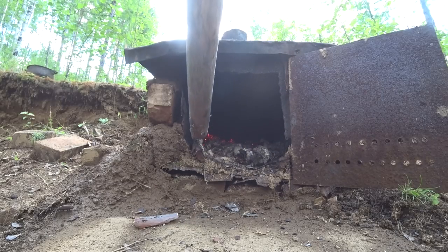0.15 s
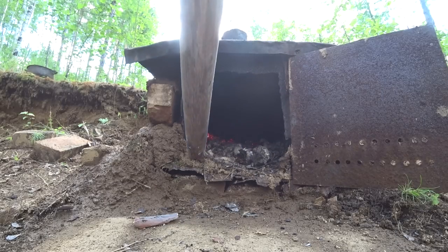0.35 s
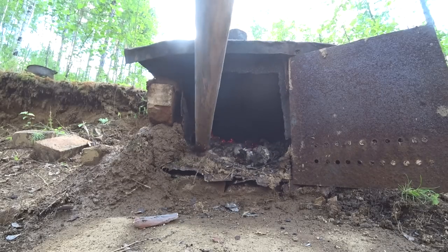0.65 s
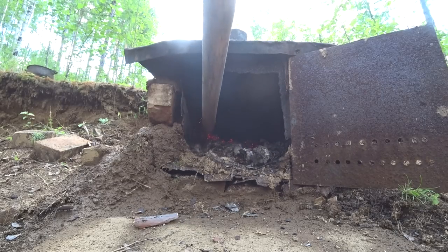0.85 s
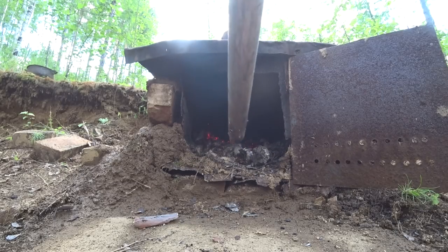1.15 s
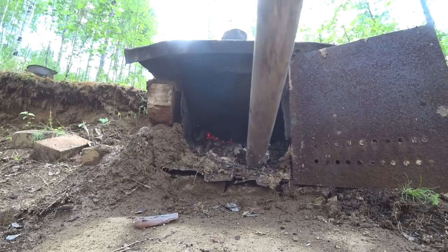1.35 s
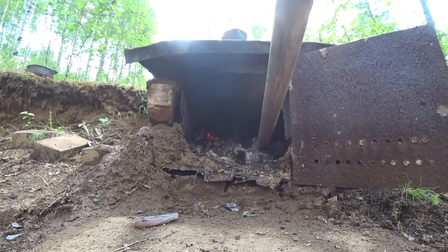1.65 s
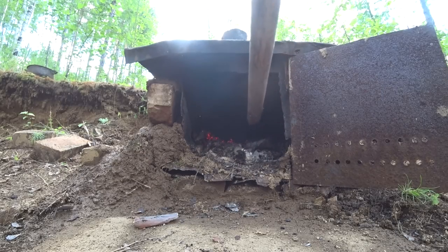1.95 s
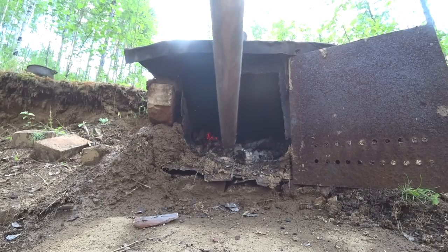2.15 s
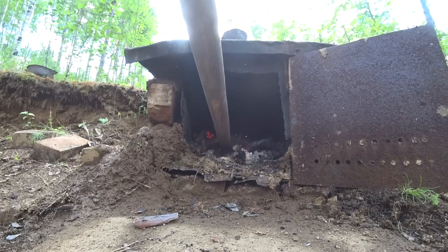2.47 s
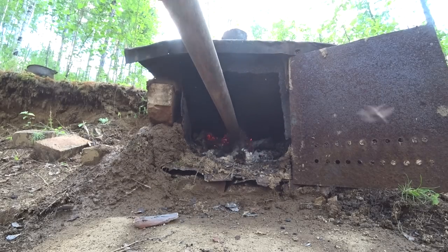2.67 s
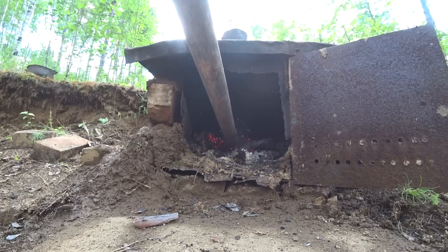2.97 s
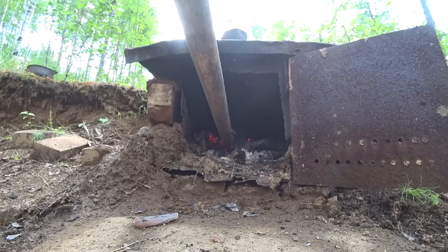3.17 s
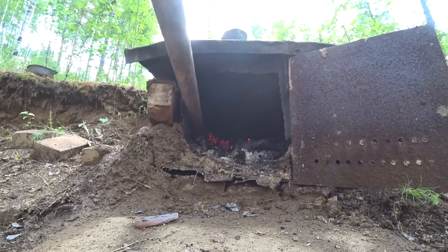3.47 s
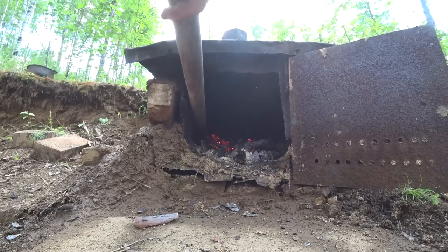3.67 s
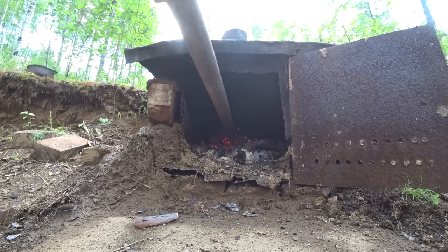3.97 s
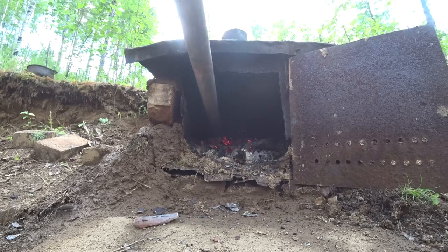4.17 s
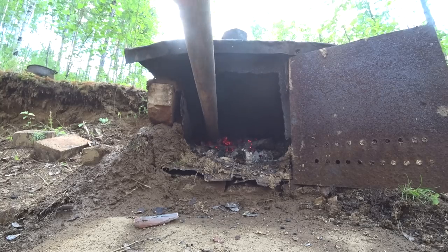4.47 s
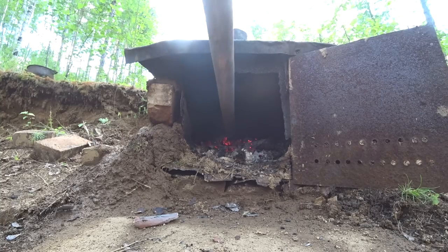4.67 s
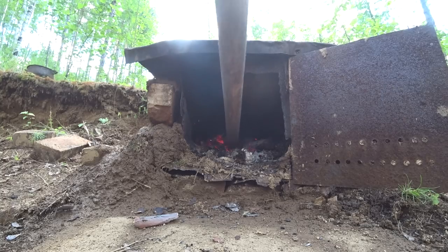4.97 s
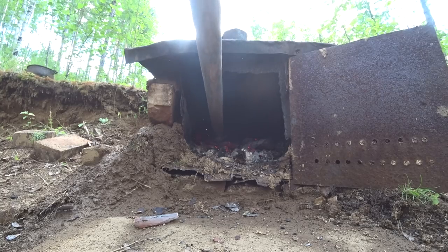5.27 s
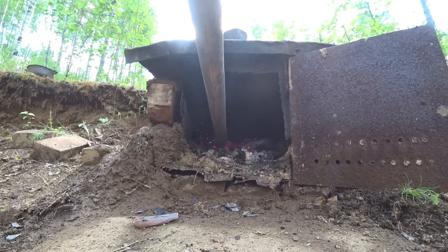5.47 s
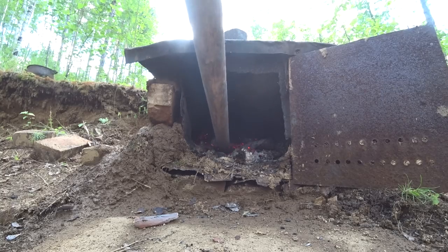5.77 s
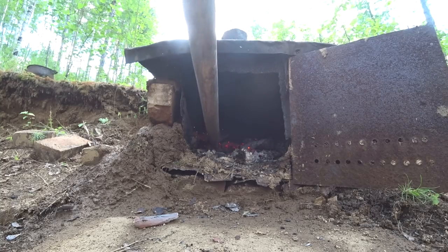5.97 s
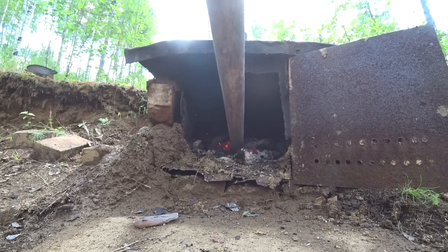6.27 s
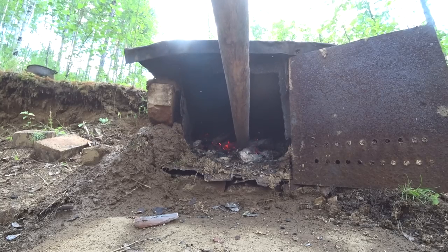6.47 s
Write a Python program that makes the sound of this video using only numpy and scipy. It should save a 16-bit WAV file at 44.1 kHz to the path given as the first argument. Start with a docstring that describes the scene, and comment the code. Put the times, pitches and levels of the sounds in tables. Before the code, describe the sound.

A long-handled rake scrapes and clanks through crunching charcoal in a small sheet-iron firebox, embers snapping sharply, a fly briefly buzzing past.

```python
"""Faint forest hiss and lone ember snaps, then a long-handled rake drags through a low sheet-iron firebox.
Leaves, wind and fire are random spectra; crunching charcoal and snaps are shaped noise bursts.
The iron box rings and the bed of embers thuds as sums of dying sines, struck by blows or shaken by grit.
Twice a fly buzzes past as a trembling harmonic stack; short echoes spread the near sounds in stereo."""
import sys
import numpy as np
from scipy import signal
from scipy.io import wavfile
from scipy.ndimage import uniform_filter1d

SR = 44100
rng = np.random.default_rng(int(sys.argv[2]) if len(sys.argv) > 2 else 0)


def master(y):
    """Save y as 16-bit WAV."""
    cut = np.clip(np.atleast_2d(y).T, -1, 1)
    pcm = np.round(cut * 32767)  # scale
    wavfile.write(sys.argv[1], SR, pcm.astype(np.int16))


def magnitude_from_level(level_db):
    """Linear magnitude for a level in decibels (20 dB per decade)."""
    exponent = np.asarray(level_db, float) / 20
    return 10 ** exponent


N = 291942  # length in samples


def evened(x):
    """Scales to rms 1."""
    return x / np.sqrt(np.mean(x ** 2) + 1e-20)


def read(points, hz):
    """Reads a spectrum in dB, interpolating along log frequency."""
    f, value = np.transpose(points)
    return np.interp(np.log(hz + 1), np.log(f + 1), value)


def add(mix, start_s, sound):
    """Mixes a sound in at start_s, cutting what runs past the end."""
    part = mix[..., round(start_s * SR):][..., :sound.shape[-1]]
    part += sound[..., :part.shape[-1]]


def colour(x, points):
    """Filters by a spectrum with causal (minimum) phase, so that clicks stay sharp."""
    hz = abs(np.fft.fftfreq(2048, 1 / SR))
    log_gain = np.log(magnitude_from_level(read(points, hz)))
    response = np.exp(np.conj(signal.hilbert(log_gain)))
    taps = np.fft.ifft(response).real[:1024]
    return signal.oaconvolve(x, taps)[:len(x)]


def ringing(modes, detune, damping=1, soft_s=.001):
    """A struck body: dying sines with a soft start; damping multiplies every t60."""
    t = np.arange(8000) / SR
    rings = 0
    for (hz, db, t60), off in zip(modes, detune):
        decay = magnitude_from_level(db - 60 * t / (t60 * damping))
        rings = rings + decay * np.sin(2 * np.pi * hz * (1 + off) * t)
    return rings * (1 - np.exp(-t / soft_s))


def grit(per_s, spread_db, clump_db, clump_s):
    """Random clicks of uneven size that come in clumps, as lumps break one after another."""
    spread = magnitude_from_level(spread_db * np.minimum(rng.exponential(1, N), 4))
    size = spread * rng.standard_normal(N)
    clumps = evened(uniform_filter1d(rng.standard_normal(N), max(int(clump_s * SR), 1)))
    clicks = rng.random(N) < per_s / SR
    return evened(size * clicks * magnitude_from_level(clump_db * clumps))


# Tone of leaves, wind and fire: pitch_hz, level_db (relative, per Hz)
FOREST_TONE = [(12, -20), (20, 3.5), (60, -13), (118, -14), (170, -16), (280, -18.5), (460, -20.5),
               (740, -25), (1400, -24), (2100, -31), (4000, -34), (6700, -36.5), (7650, -26.5), (8500, -39),
               (11400, -38), (14800, -85)]
# Stereo width of far sounds: pitch_hz, side_db (against mid)
FOREST_WIDTH = [(60, -14), (140, -1), (350, 5), (840, 8.5), (2020, 6.5), (4880, 2.5), (11800, -4)]


def forest():
    """Faint leaves, wind and fire hiss: random short-time spectra with drifting patches."""
    frames, hz = N // 256 + 5, np.fft.rfftfreq(1024, 1 / SR)
    a, b, c, d, patches = rng.standard_normal((frames, 513, 5)).T
    patches = uniform_filter1d(patches, size=12, axis=0)  # along frequency
    patches = evened(uniform_filter1d(patches, size=14, axis=1))  # along time
    width = magnitude_from_level(read(FOREST_WIDTH, hz))[:, None]
    spectra = np.array([a + 1j * b, (c + 1j * d) * width])
    spectra *= magnitude_from_level(read(FOREST_TONE, hz)[:, None] + 2.0 * patches)
    mid, side = signal.istft(spectra, nperseg=1024, noverlap=768)[1][:, :N]
    mid_rms_db = -59.5
    return magnitude_from_level(mid_rms_db) * np.array([mid + side, mid - side]) / mid.std()


# Tone of breaking charcoal, for snaps and crunching: pitch_hz, level_db (relative, per Hz)
CHARCOAL_TONE = [(880, -5.5), (1500, -12), (2940, -8), (4280, -1.5), (5160, -2.5), (6070, 0), (7640, 1),
                 (10800, -4.5), (11200, -8), (11500, -32), (15000, -19), (22000, -120)]
# Single embers snapping: start_s, level_db (of the burst), body (0 thin tick to 1 full crack)
EMBER_SNAPS = [(0.0448, -42.5, 1), (0.272, -45.5, 0.7), (0.4904, -41, 0.6), (0.5816, -27, 0.8),
               (0.6545, -25, 1), (0.6878, -21.5, 0.7), (0.7035, -17, 0.1), (0.7724, -28, 0.2),
               (0.786, -22.5, 0.25), (0.921, -39.5, 0.5), (1.1178, -48, 0.6), (1.255, -39.5, 0.7),
               (1.423, -45.5, 0.2), (1.5178, -26.5, 0.8), (1.545, -33, 0.9), (1.6248, -40, 0.8),
               (1.6602, -42.5, 0.5), (1.717, -36.5, 0.7), (1.7591, -27.5, 1), (1.941, -39, 0.5),
               (1.9759, -39.5, 1), (2.001, -44.5, 0.5), (2.045, -37.5, 0.2), (2.0592, -41, 0.4),
               (2.0936, -46, 0.6), (2.2453, -38, 0.6), (2.2723, -22.5, 0.4), (2.2824, -31, 0.3),
               (2.5925, -24, 0.3), (2.6447, -26, 0.3), (2.7468, -27.5, 0.4), (2.9095, -32, 0.5),
               (2.9274, -21, 0.04), (2.9568, -25, 0.05), (3.001, -38.5, 0.94), (3.025, -26, 0.67),
               (3.0678, -31, 0.3), (3.114, -35, 0.9), (3.1752, -38, 0.8), (3.1968, -27.5, 0.34),
               (3.237, -33, 0.4), (3.2575, -30, 0.5), (3.277, -27.5, 0.57), (3.3458, -41.5, 0.3),
               (3.402, -41.5, 0.8), (3.4241, -33.5, 0.7), (3.456, -38, 1), (3.482, -28.5, 0.73),
               (3.5094, -29, 0.4), (3.5757, -25, 0.4), (3.6065, -16.5, 0.34), (3.7454, -33, 0.6),
               (3.8174, -33, 0.6), (3.905, -24.5, 1), (3.9623, -28, 0.1), (4.0472, -27.5, 0.36),
               (4.0757, -29, 1), (4.134, -22, 0.5), (4.1883, -38, 0.5), (4.2462, -30.5, 0.7),
               (4.2662, -25, 0.3), (4.317, -25.5, 0), (4.3612, -18, 0), (4.4387, -27.5, 0.3),
               (4.497, -25, 0), (4.5936, -20.5, 0), (4.6084, -28.5, 0.1), (4.6399, -46, 0.4),
               (4.6743, -35, 0.3), (4.691, -30.5, 0.4), (4.803, -35.5, 0.3), (4.83, -34.5, 0.6),
               (4.9075, -40, 0.5), (4.9238, -23.5, 1), (5.015, -25, 0.3), (5.09, -32, 0.2),
               (5.1792, -35, 0.6), (5.2025, -34, 0.5), (5.228, -36, 0.2), (5.2498, -27, 0),
               (5.3146, -17.5, 0.5), (5.3597, -35, 0.3), (5.3996, -33, 0.2), (5.5834, -39, 0.5),
               (5.622, -44, 0.5), (5.6456, -41, 0.8), (5.6924, -35, 0.3), (5.702, -26, 0.4),
               (5.8527, -24, 0.2), (5.995, -11.5, 0.08), (6.0798, -40.5, 0.1), (6.3757, -37, 0.19),
               (6.4253, -30.5, 0.4), (6.5021, -18.5, 0.83), (6.551, -32, 0.5), (6.5943, -35.5, 0.9)]


def snaps():
    """Each snap is a burst of splinters that swells briefly and dies; fuller ones reach lower and ring longer."""
    rise_s, tick_t60_s, crack_t60_s = .0009, 0.0093, 0.015
    out, t = np.zeros(N), np.arange(2600) / SR
    for start_s, level_db, body in EMBER_SNAPS:
        splinters = rng.standard_normal(len(t)) * magnitude_from_level(5.8 * rng.standard_normal(len(t)))
        t60 = tick_t60_s + (crack_t60_s - tick_t60_s) * np.clip(body, 0, 1)
        shape = (1 - np.exp(-(t / rise_s) ** 2)) * magnitude_from_level(-60 * t / t60)
        # thin snaps tilt towards the treble around 8 kHz
        tone = [(hz, db - 5.8 * (1 - body) * np.log2(8000 / hz)) for hz, db in CHARCOAL_TONE]
        burst = colour(splinters * shape, tone)
        # the energy is set from the envelope, so short and long bursts match in strength
        strength = np.linalg.norm(shape / shape.max()) / np.linalg.norm(burst) / 2
        add(out, start_s, magnitude_from_level(level_db) * burst * strength)
    return out


def crunching():
    """Charcoal breaks in puffs of noise; big, middling and fine crumbs fill their own bands, partly in step."""
    puff = np.exp(-np.arange(600) / 60.)  # each break lasts a millisecond or two
    shared, out = grit(2300.0, 1.05, 1.8, .02) ** 2, np.zeros(N)
    for band_hz in [(300, 4500), (4500, 7500), (7500, 12000)]:
        breaks = shared + 0.73 * grit(1500., 2.1, 4.9, 0.012) ** 2
        power = signal.oaconvolve(breaks, puff ** 2)[:N]
        band = signal.butter(2, band_hz, "band", fs=SR, output="sos")
        out += signal.sosfilt(band, np.sqrt(abs(power)) * rng.standard_normal(N))
    return colour(out, CHARCOAL_TONE)


# Modes of the firebox, for scrapes and clanks: pitch_hz, level_db (relative), t60_s (before damping)
BOX_MODES = [(450, 1, 0.019), (560, 12.5, 0.013), (1070, 4, 0.028), (1473, -1, 0.033), (1655, 6, 0.021),
             (2246, 6.5, 0.022), (2790, 1.5, 0.031), (3567, 9, 0.015)]


def scraped_box():
    """Dense grit on the iron floor keeps the heavily damped box modes ringing."""
    ring = ringing(BOX_MODES, np.zeros(len(BOX_MODES)), damping=0.22, soft_s=0.0033)
    return signal.oaconvolve(grit(2500., 1.5, 3.8, 0.0056), ring)[:N]


# Modes of ground and ember bed, for rumble and thuds: pitch_hz, level_db (relative), t60_s (before damping)
BED_MODES = [(57.6, 6, 0.055), (86, -27, 0.017), (121, -4.5, 0.072), (171, 2.5, 0.031),
             (217.6, -4.5, 0.049), (280, -11.5, 0.067), (381, -12.5, 0.047)]


def shaken_ground():
    """Sparser grit shakes the low modes of the ground and bed."""
    ring = ringing(BED_MODES, np.zeros(len(BED_MODES)), damping=.65, soft_s=.003)
    return signal.oaconvolve(grit(600., 3., 2., .015), ring)[:N]


# Rake strokes, one list each: start_s (of each point), crunch_db (charcoal), scrape_db (iron floor)
RAKE_STROKES = [
    [(.487, -51, -53), (.573, -45.5, -52), (.679, -46, -46.5), (.707, -26, -61), (.735, -44.5, -81),
     (.8, -41.5, -61), (.88, -54.5, -65), (.95, -53, -71)],
    [(1.45, -51.5, -51), (1.514, -50, -48), (1.545, -54, -46), (1.6, -58, -77)],
    [(1.648, -55, -54), (1.673, -38, -51), (1.703, -70, -57.5), (1.76, -45.5, -55), (1.79, -52.5, -58),
     (1.9, -73, -78)],
    [(2.23, -42, -41.5), (2.287, -43, -49), (2.435, -44.5, -49.5), (2.569, -42.5, -48), (2.61, -50, -54),
     (2.681, -49.5, -63.5), (2.889, -53.5, -72), (2.91, -51, -63), (2.985, -52.5, -68)],
    [(3.026, -44, -56), (3.106, -61, -63.5), (3.19, -57.5, -77), (3.282, -57, -58.5), (3.36, -66, -72)],
    [(3.505, -24, -28.5), (3.547, -39, -46), (3.615, -33.5, -59), (3.667, -42, -54), (3.855, -30.5, -44.5),
     (3.93, -46, -51.5), (4.021, -55, -92), (4.081, -59, -58), (4.125, -65, -74)],
    [(4.248, -50, -56), (4.267, -28.5, -45), (4.297, -43.5, -57.5), (4.435, -47, -54), (4.475, -41, -49),
     (4.555, -51.5, -86), (4.6, -55.5, -65), (4.66, -60, -74)],
    [(4.897, -40, -47), (4.913, -39.5, -39), (5.131, -49.5, -64.5), (5.175, -63, -84), (5.209, -55.5, -64),
     (5.249, -50.5, -60), (5.29, -71, -69)],
    [(5.347, -40, -28), (5.361, -29.5, -30), (5.397, -52, -52.5), (5.415, -41, -69), (5.5, -85, -93)],
    [(5.684, -62, -57), (5.702, -35.5, -44), (5.748, -57, -58.5), (5.782, -49, -48), (5.874, -38.5, -53),
     (5.97, -53.5, -52), (6.011, -53.5, -63), (6.147, -60.5, -62)],
    [(6.175, -42, -37), (6.209, -62, -58), (6.265, -45, -51), (6.383, -51.5, -59), (6.473, -53, -64),
     (6.56, -58, -61.5), (6.62, -41.5, -45)],
]


def stroke_levels():
    """Joins the strokes into three gain curves; each starts at once, and loosened ash trickles on after it."""
    levels = np.zeros((3, N))
    for rows in RAKE_STROKES:
        s, crunch_db, scrape_db = np.transpose(rows)
        # the ground shakes with a blend of crunch and scrape
        rumble_db = -3.5 + scrape_db + 0.89 * (crunch_db - scrape_db)
        t = np.arange(s[0], s[-1], 1 / SR)
        fade_in, fade_out = (t - s[0]) / 0.0064, (s[-1] - t) / 0.011
        edge = np.minimum(np.minimum(fade_in, fade_out), 1)
        curves_db = [np.interp(t, s, column) for column in (crunch_db, scrape_db, rumble_db)]
        add(levels, s[0], edge * magnitude_from_level(curves_db))
    keep = np.exp(-1 / (.15 * SR))  # the trickle fades in power over 0.15 s
    trickle = signal.lfilter([1 - keep], [1, -keep], levels ** 2)
    return np.sqrt(levels ** 2 + magnitude_from_level([[-38], [-40], [-40]]) * trickle)


def drag():
    """Breaking charcoal hisses; the same scraping shakes the box and the ground."""
    crunch, scrape, rumble = stroke_levels()
    hiss = crunch * evened(crunching())
    return hiss + scrape * evened(scraped_box()) + rumble * evened(shaken_ground())


def struck_near(modes, hz, fall_db, t60_here):
    """The struck spot rings at hz and favours the modes near it; others fall off by the octave."""
    rest = [(f, db - fall_db * abs(np.log2(f / hz)), t60) for f, db, t60 in modes]
    return [(hz, 2.5, t60_here)] + rest


def blows(rows, modes, fall_db, t60_here, detune, soft_s):
    """Each blow rings the modes of the struck thing, a little out of tune from blow to blow."""
    out = np.zeros(N)
    offsets = rng.standard_normal((len(rows), len(modes)))
    for (start_s, peak_db, hz, damping), off in zip(rows, offsets):
        struck = struck_near(modes, hz, fall_db, t60_here)
        ring = ringing(struck, detune * np.r_[0, off], max(damping, .1), soft_s)
        add(out, start_s, magnitude_from_level(peak_db) * ring / abs(ring).max())
    return out


# Rake clanking on the iron: start_s, peak_db, pitch_hz (struck spot), damping (factor on t60)
RAKE_CLANKS = [(.489, -36, 1010, 0.61), (.658, -35, 1370, 0.72), (.697, -31.5, 1720, 0.53),
               (.702, -32, 1320, 1.6), (.891, -29.5, 1820, 0.4), (1.461, -27.5, 920, 0.42),
               (1.544, -42, 1620, 0.46), (1.652, -44, 1140, 1.1), (1.762, -38, 483, 0.67),
               (2.232, -34, 2370, 0.37), (2.241, -29.5, 1015, 4.8), (2.29, -32.5, 2620, 0.85),
               (2.561, -52, 1014, 1.6), (3.508, -30, 264, 1.4), (3.596, -41, 2070, .73),
               (3.736, -35, 497, 1), (3.79, -39, 716, 0.43), (3.843, -27.5, 1047, 2.7),
               (4.075, -46, 1380, 0.34), (4.257, -32, 465, .8), (4.494, -38, 523, .56),
               (4.907, -39, 657, 0.21), (4.91, -34.5, 1140, 2.4), (4.924, -27, 1630, 2),
               (4.98, -35.5, 2230, 1.5), (5.347, -31.5, 604, 1.9), (5.419, -37, 1700, 0.87),
               (5.685, -37.5, 1070, 2.1), (5.721, -32, 1140, 1.8), (5.785, -39.5, 1086, 2.2),
               (5.955, -36.5, 978, 1.5), (5.994, -46, 2780, .61), (6.181, -28, 1070, 0.79)]


def clanks():
    """The rake strikes sheet iron, which rings at the struck spot and in the box modes."""
    return blows(RAKE_CLANKS, BOX_MODES, fall_db=5.5, t60_here=0.053, detune=0.016, soft_s=0.0012)


# Rake thudding into the bed: start_s, peak_db, pitch_hz (struck spot), damping (factor on t60)
RAKE_THUDS = [(.489, -39, 204, 0.8), (.665, -38, 116, .8), (1.461, -32, 210, 0.96), (1.544, -38, 80, .52),
              (1.652, -39, 130, 1.2), (1.762, -30, 160, 0.32), (2.561, -45.5, 187, 1.9),
              (3.508, -16, 130, 1.7), (3.596, -33, 147, 0.52), (3.736, -29, 129, 1), (3.79, -35, 150, .47),
              (3.843, -34.5, 138, 1.8), (3.98, -42, 128, 1.5), (4.257, -26.5, 101.5, 1.8),
              (4.475, -29.5, 119, 0.54), (4.907, -39, 270, 0.36), (4.93, -42, 99, 2), (5.04, -46, 297, 1.4),
              (5.21, -39.5, 140, 0.4), (5.35, -32, 171, 1.8), (5.419, -53, 135, 0.85),
              (5.721, -34.5, 100, 1.1), (6.6, -41, 100.2, 3.3)]


def thuds():
    """The rake lands in the bed, whose low modes answer with a softer start."""
    return blows(RAKE_THUDS, BED_MODES, fall_db=8.0, t60_here=0.075, detune=0.058, soft_s=.003)


# Wing overtones: multiple (of the wingbeat), level_db (relative)
WING_OVERTONES = [(2, 1), (3, -10), (4, -10.5), (5, -11), (6, -10)]
# Fly passes, one list each: start_s (of each point), pitch_hz (wingbeat), overtones_db,
# beat_db (fundamental against the overtones, as the fly turns)
FLY_PASSES = [
    [(2.29, 221, -72, 9), (2.332, 221.7, -55.5, 4), (2.4, 203.1, -77, -5), (2.52, 202.3, -55.5, 1),
     (2.58, 201.8, -58.5, 7), (2.66, 189, -63, -1), (2.69, 219, -59, -18), (2.78, 213, -75, -3)],
    [(6.05, 198, -76, 3), (6.114, 208.5, -64.5, -2), (6.242, 205.5, -59.5, -8), (6.33, 224.8, -54.5, -9),
     (6.384, 208.8, -61.5, -15), (6.428, 234.2, -47.5, -3), (6.458, 213.5, -72, 10),
     (6.49, 223.6, -53, 5.5), (6.62, 213.7, -56.5, 1)],
]


def fly(rows):
    """Wingbeats: a harmonic stack whose pitch and loudness tremble as the fly swerves."""
    s, *columns = np.transpose(rows)
    t = np.arange(s[0], s[-1], 1 / SR)
    hz, overtones_db, beat_db = (np.interp(t, s, column) for column in columns)
    noises = rng.standard_normal((2, len(t)))
    swerve, flutter = (evened(uniform_filter1d(noise, size=700)) for noise in noises)
    angle = 2 * np.pi * np.cumsum(hz * (1 + .013 * swerve)) / SR
    overtones = sum(magnitude_from_level(db) * np.cos(k * (angle + 1)) for k, db in WING_OVERTONES)
    wings = magnitude_from_level(overtones_db) * (magnitude_from_level(beat_db) * np.cos(angle) + overtones)
    fade = signal.windows.tukey(len(t), .04)
    return s[0], np.sqrt(2) * magnitude_from_level(2.5 * flutter) * wings * fade


def firebox_echo(x, t60):
    """Short echo: three random tails crossfade steadily, nine turns a second, so no one colour stays."""
    t, turn = np.arange(3000) / SR, np.arange(N) / SR * 2 * np.pi * 9
    sparse = rng.standard_normal((3, len(t))) * (rng.random((3, len(t))) < .1)
    taps = sparse * magnitude_from_level(-60 * t / t60) * (t > .0008)
    taps = taps / np.linalg.norm(taps, axis=1)[:, None]
    # the squared shares always sum to one
    shares = np.sqrt(2 / 3) * np.cos(turn + np.arange(3)[:, None] * np.pi / 3)
    return signal.oaconvolve(x * shares, taps, axes=1).sum(0)[:N]


# Stereo width of near sounds: pitch_hz, side_db (against mid)
NEAR_WIDTH = [(60, -21), (170, -20), (500, -10.5), (1420, -10), (4090, -10), (11800, -12.5)]


def scene():
    """Near sounds share one mid signal; their echoes reach the two channels unalike."""
    near = drag() + clanks() + thuds() + snaps()
    # keeps the summed rings and thuds free of deep bass below about 70 Hz
    near = signal.sosfilt(signal.butter(2, 70.5, "high", fs=SR, output="sos"), near)
    side = colour(firebox_echo(near, t60=0.01), NEAR_WIDTH)
    near = near + magnitude_from_level(-11) * firebox_echo(near, t60=.02)
    for rows in FLY_PASSES:
        add(near, *fly(rows))
    balance = magnitude_from_level([[.3], [-.3]])  # first channel slightly louder
    return near * balance + side * [[1], [-1]] + forest()


def low_pass(x):
    """Removes everything above the highest recorded frequency."""
    return signal.sosfilt(signal.butter(12, 12360, fs=SR, output="sos"), x)


def record(dry):
    """Rolls off the treble above 11.25 kHz with a steep linear-phase filter."""
    lowpass = signal.firwin(191, 11250, window=("kaiser", 6), fs=SR)
    narrow = signal.oaconvolve(dry, lowpass[None], "same")
    return low_pass(narrow)


dry = scene()
out = record(dry)
master(out)
```